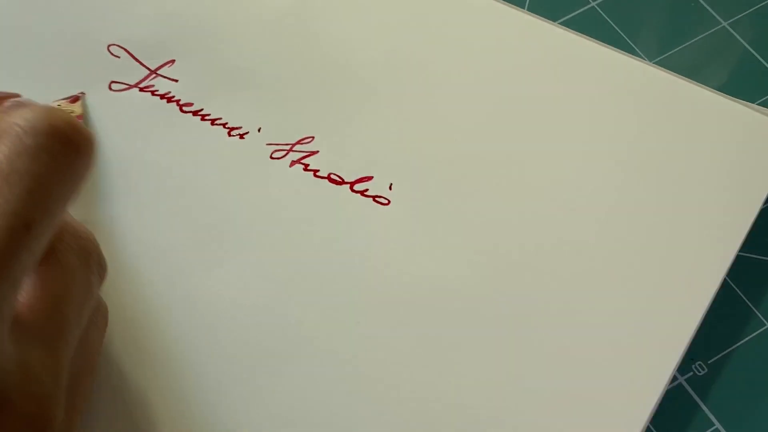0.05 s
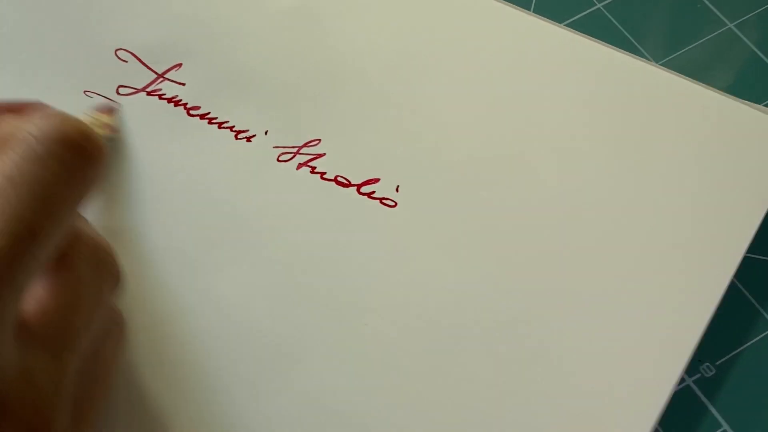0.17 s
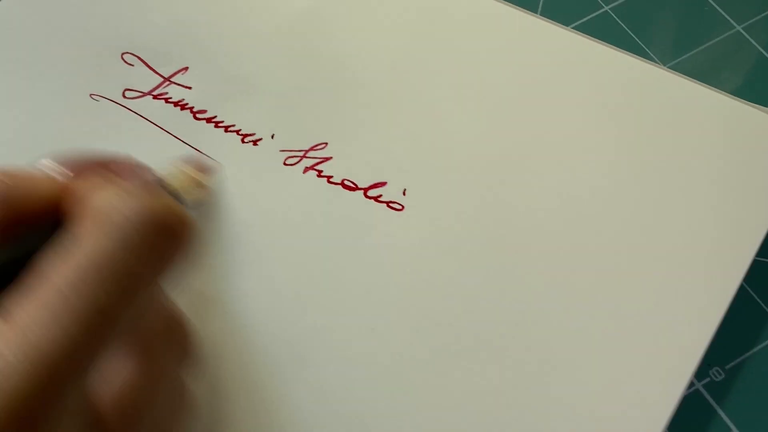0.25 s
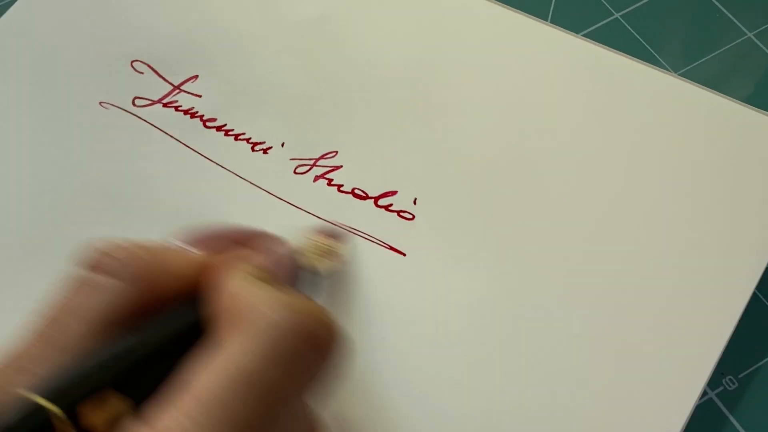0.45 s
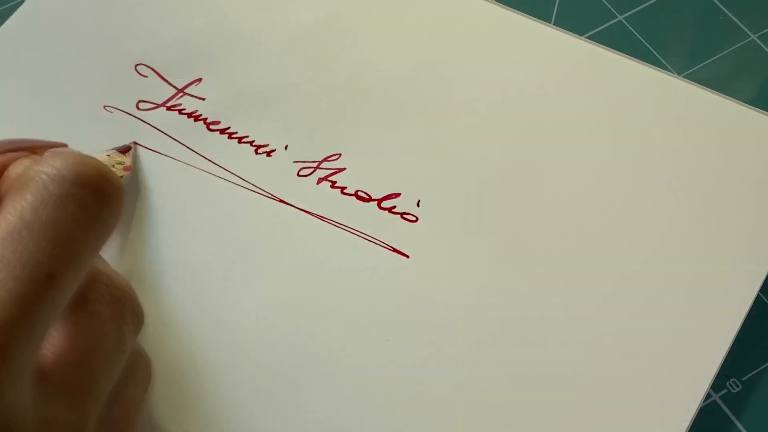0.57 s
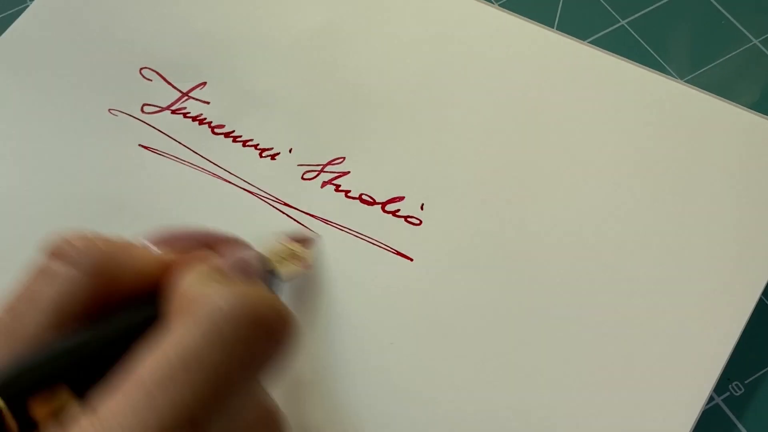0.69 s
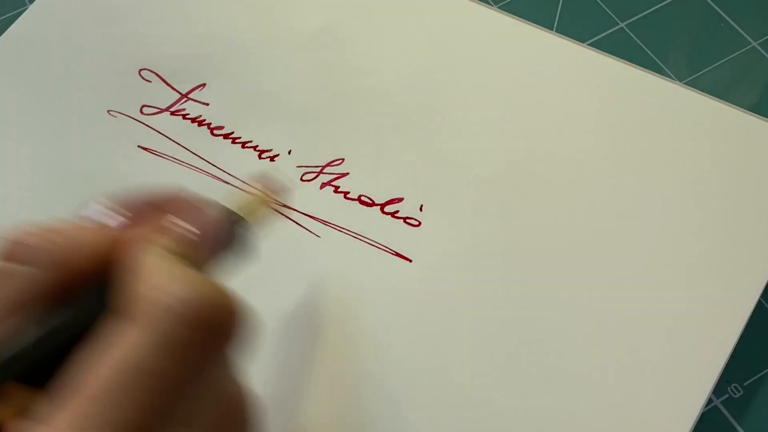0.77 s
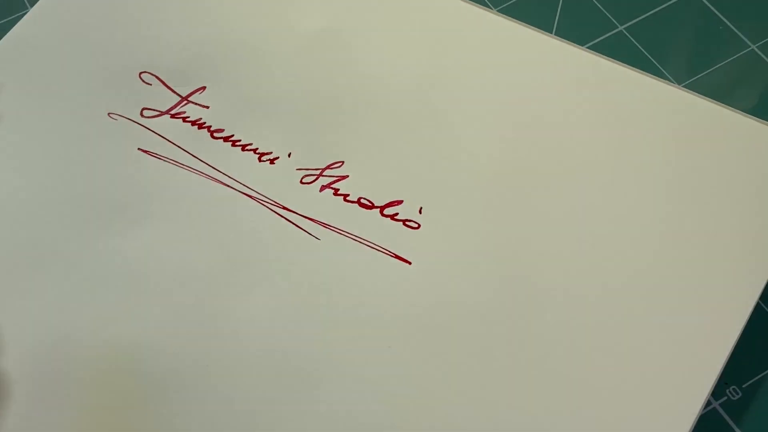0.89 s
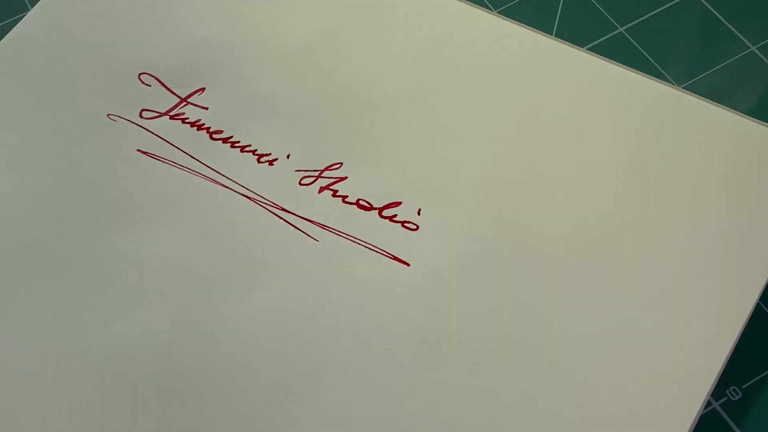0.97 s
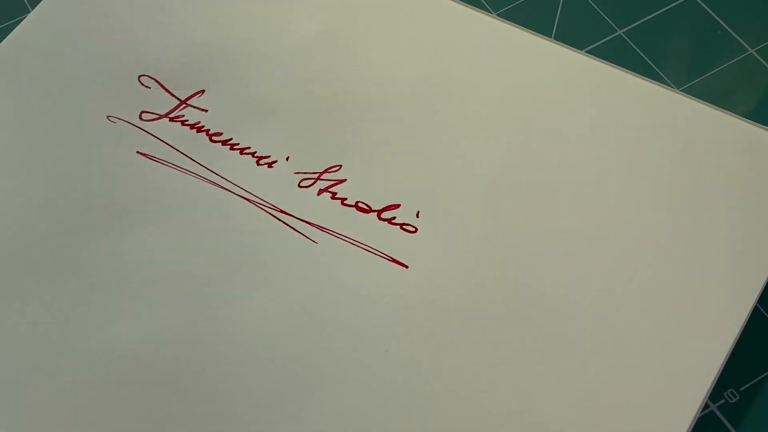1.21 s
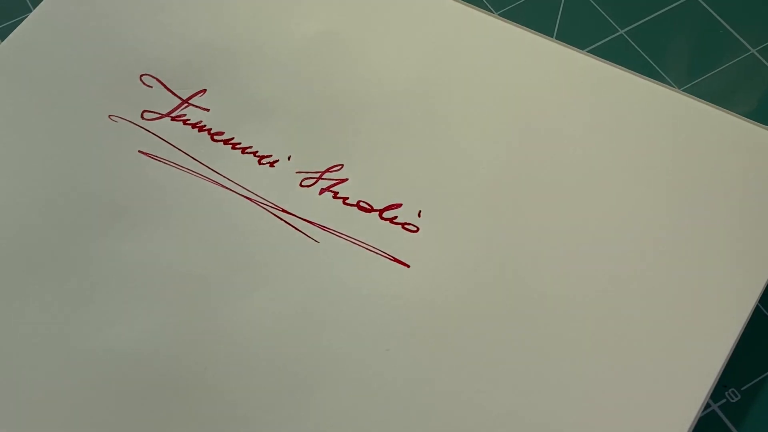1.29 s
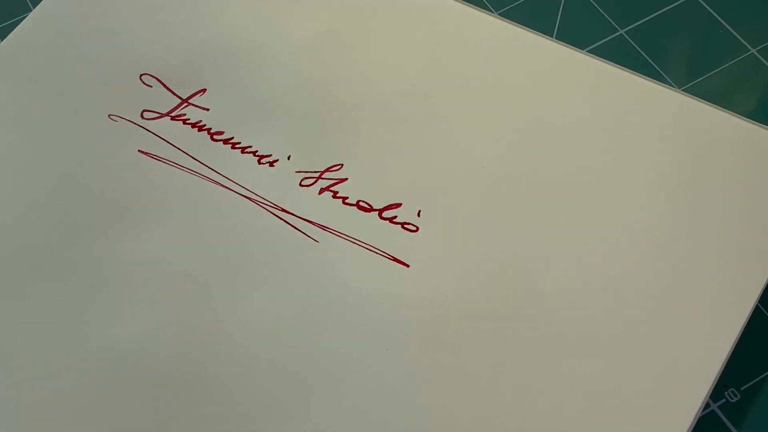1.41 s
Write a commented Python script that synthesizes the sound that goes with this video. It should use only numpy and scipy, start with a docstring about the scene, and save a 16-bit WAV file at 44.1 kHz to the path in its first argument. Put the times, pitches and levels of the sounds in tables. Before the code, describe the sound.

Close, dry mono pickup of a metal nib underlining on a sheet over a desk: faint finger scuffs, three rapid ringing scratches, then only gentle hand rubs and dull little bumps over low room hush.

```python
"""A small room's hush and faint scuffs of fingers on paper come first; then a fountain pen underlines a signature.
Three quick strokes go mainly right, back left and hard right. Paper fibres pluck the nib at random moments,
and the pen, sheet and desk turn these tiny clicks into a ringing scratch, with hiss, drumming and bright snags.
The hand bumps softly during the strokes and after them, and goes on rubbing and brushing over the paper.
Bumps and scuffs are shaped tones and noise; echoes, faint rings and room reflections surround the pen."""
import sys
import numpy as np
from scipy import signal
from scipy.fft import rfft, irfft
from scipy.io import wavfile
from scipy.ndimage import uniform_filter1d, map_coordinates

SR = 44100
rng = np.random.default_rng(int(sys.argv[2]) if len(sys.argv) > 2 else 0)


def generate_wav(sig):
    """Save sig (samples, or channels by samples) to the path in sys.argv[1] as 16-bit PCM at SR."""
    pcm = np.round(np.clip(np.atleast_2d(sig).T, -1, 1) * 32767).astype(np.int16)
    wavfile.write(sys.argv[1], SR, pcm)


N = 63945
T = np.arange(N) / SR  # time in s
HZ = np.fft.rfftfreq(2 * N, 1 / SR)  # filter frequencies; twice the length leaves room for ringing

# In the colour tables only the shape counts: the filtered sound is brought to rms 1 afterwards.
# still air of the room [f/Hz, relative level/dB]
AIR_COLOUR = [(18, -40), (28, -4), (40, -4), (58, 1), (78, -1), (112, 1.5), (160, -6), (270, -3.5),
              (450, -14), (1000, -17), (3000, -30.5), (7000, -41), (10500, -46.5), (16000, -35)]
AIR_DB = -61
# fade time of the room's reflections [f/Hz, time to fall 60 dB/s]
ROOM_FADE = [(200, 1), (1000, 0.28), (2500, 0.53), (5000, 0.21), (10000, 0.37), (16000, .2)]
ROOM_DB = -10.5  # relative to the pen
# things on the desk that ring in sympathy [f/Hz, time to fall 60 dB/s, gain at the centre/dB]
SYMPATHETIC_RINGS = [(329, 0.26, 13.5), (830, .5, -3), (1650, 0.42, -2), (2530, 0.54, -4)]
# echoes from nearby surfaces [delay at left end/s, delay at right end/s, level relative to the pen/dB]
ECHO_PATHS = [(.0021, 0.0021, -17), (.0047, .0042, -17), (.0083, 0.011, -14)]
# rising scuffs of fingers on paper [start t/s, length/s, level/dB, first f/Hz, last f/Hz, width/Hz]
FINGER_SCUFFS = [(0.066, 0.073, -64.5, 1340, 1950, 480), (0.083, 0.055, -67, 758, 1150, 450),
                 (.80, .125, -65, 4770, 6200, 1550)]
# dull rub of the sliding hand [t/s, level/dB], and its colour [f/Hz, relative level/dB]
RUB_LEVEL = [(0, -76), (.06, -75.5), (.09, -71.5), (.125, -70.5), (.15, -75.5), (.70, -57), (.78, -56),
             (.83, -55), (.89, -62), (.94, -66.5), (1.0, -61), (1.06, -61.5), (1.11, -64), (1.2, -61),
             (1.26, -60), (1.35, -59), (1.45, -59)]
RUB_COLOUR = [(100, -4), (280, 0), (600, 4), (1050, -1), (1400, 0.5), (2400, -2), (3100, -1.5), (3600, -6),
              (5000, -10), (8000, -18), (10500, -30), (15500, -22)]
RUB_RING_HZ, RUB_RING_WIDTH_HZ, RUB_RING_DB = 3010, 320, -3  # the rubbed paper's own resonance
# light brush of the sliding hand [t/s, level/dB], and its colour [f/Hz, relative level/dB]
BRUSH_LEVEL = [(0, -81), (.1, -71.5), (.15, -82), (.74, -93), (.81, -60), (.885, -61.5), (.92, -66.5),
               (.96, -77), (.99, -64.5), (1.055, -58), (1.09, -60.5), (1.12, -68.5), (1.21, -69.5),
               (1.25, -63), (1.33, -66), (1.45, -62.5)]
BRUSH_COLOUR = [(1000, -9), (3200, -4.5), (4900, 2), (6300, -4.5), (8200, -3.5), (9700, -9.5), (10600, -17),
                (13500, -10.5), (16000, -10)]
# bumps of the hand on the desk [start t/s, level before the fade/dB, pitch f/Hz, time to fall 60 dB/s]
HAND_BUMPS = [(.369, -41.5, 98, 0.08), (.575, -47.5, 118, 0.16), (0.807, -47.5, 65.5, 0.12),
              (1.033, -47.5, 108, 0.1), (1.24, -47, 125, 0.055)]
BUMP_RISE_S = 0.0062
# place of the nib along the underline [t/s, place from 0 = left end to 1 = right end]
NIB_PLACE = [(.16, 0.54), (.25, 0.41), (.36, 0.98), (.48, 0.54), (.57, 0.038), (.68, 0.046), (.73, 0.356)]
# bright snags of the nib in the paper [start t/s, level before the fade/dB]
NIB_SNAGS = [(.168, -54), (.446, -46), (.530, -40.5), (0.638, -48), (.664, -44), (.708, -40)]
SNAG_RISE_S, SNAG_T60_S = 0.0019, 0.04
# colour of the snags [f/Hz, relative level/dB]
SNAG_COLOUR = [(600, 0), (1300, -6), (2500, -14), (5000, -17), (6600, 3), (9500, -10), (13000, -12),
               (15000, -1.5)]
# force of the nib, one list per stroke [t/s, level/dB]
STROKE_FORCE = [
    [(.150, -80), (.166, -55.5), (.195, -47.5), (.24, -44.5), (.28, -39), (.33, -36), (.37, -36.5),
     (.395, -42), (.418, -53)],
    [(.438, -56), (.448, -44.5), (.492, -39), (.53, -41), (.56, -37.5), (.597, -38.5), (.614, -51)],
    [(.626, -60), (.640, -34.5), (.667, -30.5), (.70, -33.5), (.716, -39), (.73, -45.5), (.76, -69)],
]
# random slips per second, and how unequal they are: mean step up from the smallest slip
FIBRES_PER_S, FIBRE_SPREAD_DB = 14000, 3
TOOTH_HZ, TOOTH_DB = 347, 1.23  # fine unevenness of the paper
PATCH_HZ, PATCH_DB = 50, 0.05  # coarse unevenness
# broad colour of the scratch [f/Hz, relative level/dB]
SCRATCH_COLOUR = [(120, -45), (300, -21.5), (560, -10), (800, -1), (1400, -1), (1750, -2.5), (2150, 1),
                  (2600, -3.5), (3100, -2.5), (3900, -10.5), (4600, -9), (5200, -4.5), (5700, -25),
                  (7200, -32), (8300, -14.5), (9300, -39), (16000, -38)]
SCRATCH_DB = -0.75  # relative to the force
# resonances of pen, sheet and desk [f/Hz, width/Hz, level at left end/dB, level at right end/dB]
# MODE_DB is added to both levels
BODY_MODES = [(777, 75, -3.5, -1), (1024, 39, -1, -3), (1253.5, 60.4, -24, 5), (1552, 36, 5, 6.5),
              (1652, 40, 3, -23), (1959, 37.6, 17, -24), (2070, 49, -20, 12), (2391, 48, -2, 6.5),
              (2862, 17, -16, 6.5), (3050, 43, 8, -3), (4250, 33, -29, 3.5), (5050, 146, 3, -0.5),
              (7800, 230, -17, -22)]
MODE_DB = -3.5
# level of the scratch's low register relative to the rest [t/s, level/dB]
LOW_LEVEL = [(.17, 4.5), (.25, 1), (.30, 1.5), (.365, -2.5), (.41, 7.5), (.49, 1.5), (.548, -5), (.58, 1.5),
             (.65, -0.5), (.71, 2)]
LOW_SPLIT_HZ = 1640
# fine hiss of the nib, relative to the force [t/s, level/dB], and its colour [f/Hz, relative level/dB]
HISS_LEVEL = [(.17, -9), (.21, -9.5), (.26, -8.5), (.34, -14), (.40, -16), (.45, -12), (.535, -7.5),
              (.595, -16), (.645, -13.5), (.672, -6), (.70, -10.5), (.73, -20)]
HISS_COLOUR = [(1000, -17.5), (3000, 6), (6300, 2), (7300, 0.5), (8200, 1.5), (9100, -4.5), (10500, -7.5),
               (11700, -2.5), (13000, -6.5), (14100, 3), (14850, 10), (15400, 5.5), (16000, -1.5)]
# drumming of the sheet on the desk [f/Hz, relative level/dB]
DRUM_COLOUR = [(150, -16.5), (330, -13.5), (480, -1), (700, 5.5), (1100, -0.5), (2500, -38.5)]
# level when the force is at the knee, that force, and how steeply the drumming grows with force
DRUM_DB, DRUM_KNEE_DB, DRUM_POWER = -46.5, -33, 2.37
LOW_CUT_HZ, EDGE_HZ = 39, 15780


def amp(db):
    """Turns decibels into a gain."""
    return 10 ** (np.asarray(db) / 20)


def evened(x):
    """Scales a sound to rms 1."""
    return x / np.sqrt(np.mean(x ** 2) + 1e-20)


def read(points, hz):
    """Reads a table between its points, with frequency on a log axis."""
    f, value = np.transpose(points)
    return np.interp(np.log(hz + 1), np.log(f), value)


def level(points):
    """Gain over time, with straight lines in dB between the points."""
    return amp(np.interp(T, *np.transpose(points)))


def colour(points):
    """Filter with the given spectrum that only responds after its input (minimum phase)."""
    log_gain = np.log(amp(read(points, HZ)))
    circle = np.concatenate([log_gain, log_gain[-2:0:-1]])  # add the mirrored negative frequencies
    return np.exp(np.conj(signal.hilbert(circle)))[:len(HZ)]


def filtered(x, response):
    """Multiplies the spectrum by a response and returns to time."""
    return irfft(rfft(x, 2 * N) * response)[:N]


def through(x, response):
    """Filters a sound and brings the result to rms 1."""
    return evened(filtered(x, response))


def wander(hz):
    """Smooth random movement, mostly slower than the given rate."""
    return through(rng.standard_normal(N), np.exp(-(HZ / hz) ** 2))


def catches(per_s, spread_db):
    """Tiny slips at random moments: single-sample clicks of uneven size and random sign."""
    size = amp(spread_db * np.minimum(rng.exponential(1, N), 3))
    sign = rng.choice([-1., 1.], N)
    happens = rng.random(N) < per_s / SR
    return size * sign * happens


def blow(start, db, rise_s, t60):
    """Envelope of a knock: a quick straight rise times an exponential fall."""
    t = np.maximum(T - start, 0)
    return np.minimum(t / rise_s, 1) * amp(db - 60 * t / t60)


def place():
    """Where the nib is along the line, 0 to 1."""
    return np.clip(np.interp(T, *np.transpose(NIB_PLACE)), 0, 1)


def air():
    """Still air of the room: steady noise with a low colour."""
    return amp(AIR_DB) * through(rng.standard_normal(N), colour(AIR_COLOUR))


def room(x):
    """Diffuse reflections: a noise tail in which each frequency has its own fade time."""
    hz, t, z = signal.stft(rng.standard_normal(SR // 2), SR, nperseg=256)
    fade = amp(-60 * t / read(ROOM_FADE, hz)[:, None])
    late = t > .004
    tail = signal.istft(z * fade * late, SR, nperseg=256)[1]
    return signal.fftconvolve(x, tail / np.linalg.norm(tail))[:N]


def sympathy(x):
    """Things on the desk answer the pen: narrow resonances that ring on."""
    response = 0
    for hz, t60, db in SYMPATHETIC_RINGS:
        time_constant = t60 / np.log(1000)
        response = response + amp(db) / (1 + 2j * np.pi * (HZ - hz) * time_constant)
    return filtered(x, response)


def echoes(x):
    """Early reflections: delayed copies whose paths change as the nib travels."""
    out = np.zeros(N)
    smooth_place = uniform_filter1d(place(), size=2000)
    for left_s, right_s, db in ECHO_PATHS:
        delay = left_s + (right_s - left_s) * smooth_place
        out += amp(db) * map_coordinates(x, [(T - delay) * SR], order=3)
    return out


def scuffs():
    """Fingers on paper: narrow, fuzzy rubs whose pitch rises as the finger speeds up."""
    out = np.zeros(N)
    for start, length, db, first_hz, last_hz, width in FINGER_SCUFFS:
        along = np.clip((T - start) / length, 0, 1)
        pitch = first_hz + (last_hz - first_hz) * along
        phase = 2 * np.pi * np.cumsum(pitch) / SR
        # slow noise on both parts of a tone widens it into a band
        fuzz = wander(width / 2) * np.cos(phase) + wander(width / 2) * np.sin(phase)
        out += amp(db) * np.sin(np.pi * along) * fuzz
    return out


def hand():
    """Skin slides on paper: many tiny slips with a fine grain make a dull rub and a light brush."""
    grain = amp(0.7 * wander(180))
    ring = 1 + amp(RUB_RING_DB) / (1 + 2j * (HZ - RUB_RING_HZ) / RUB_RING_WIDTH_HZ)
    rub_slips = grain * catches(per_s=14000, spread_db=4.5)
    rub = level(RUB_LEVEL) * through(rub_slips, colour(RUB_COLOUR) * ring)
    brush_slips = grain * catches(per_s=22000, spread_db=5.5)
    brush = level(BRUSH_LEVEL) * through(brush_slips, colour(BRUSH_COLOUR))
    return rub + brush


def bumps():
    """The side of the hand nudges the desk: a few damped low cycles each time."""
    out = np.zeros(N)
    for start, db, hz, t60 in HAND_BUMPS:
        out += blow(start, db, BUMP_RISE_S, t60) * np.sin(2 * np.pi * hz * (T - start))
    return out


def snags():
    """Clumps of fibres give way at once: short bursts of bright slips."""
    bite = sum(blow(start, db, SNAG_RISE_S, SNAG_T60_S) for start, db in NIB_SNAGS)
    return bite * through(catches(FIBRES_PER_S, FIBRE_SPREAD_DB), colour(SNAG_COLOUR))


def body(end):
    """Pen, sheet and desk as a filter: broad colour plus resonances (end 0 = left, 1 = right)."""
    broad = colour(SCRATCH_COLOUR)
    rings = 0
    for hz, width, *db in BODY_MODES:
        rings = rings + amp(db[end] + MODE_DB) / (1 + 2j * (HZ - hz) / width)
    return broad + rings * broad / abs(broad)  # the rings share the broad colour's phase


def nib():
    """Fibres pluck the nib: a ringing scratch, a fine hiss, and low drumming that grows with force."""
    force = np.zeros(N)
    for stroke in STROKE_FORCE:
        touching = (T > stroke[0][0]) * (T < stroke[-1][0])
        force += level(stroke) * touching
    tooth = amp(TOOTH_DB * wander(TOOTH_HZ) + PATCH_DB * wander(PATCH_HZ))
    slips = tooth * catches(FIBRES_PER_S, FIBRE_SPREAD_DB)

    # blend the sound of the two ends as the nib travels
    at_left, at_right = through(slips, body(0)), through(slips, body(1))
    scratch = amp(SCRATCH_DB) * ((1 - place()) * at_left + place() * at_right)
    low = filtered(scratch, 1 / (1 + (HZ / LOW_SPLIT_HZ) ** 10))
    scratch = scratch + (level(LOW_LEVEL) - 1) * low

    hiss_slips = tooth * catches(FIBRES_PER_S, FIBRE_SPREAD_DB)
    hiss = level(HISS_LEVEL) * through(hiss_slips, colour(HISS_COLOUR))
    drum_level = amp(DRUM_DB) * (force / amp(DRUM_KNEE_DB)) ** DRUM_POWER
    drum = drum_level * through(slips, colour(DRUM_COLOUR))
    return force * (scratch + hiss) + drum


def scene():
    """Pen and hand close by, over the room's low hush."""
    pen = nib() + snags()
    space = echoes(pen) + sympathy(pen) + amp(ROOM_DB) * room(pen)
    return (pen + space + bumps() + hand() + scuffs() + air())[None]


def record(dry):
    """The recorder cuts the deep bass and the highest treble."""
    bass_cut = signal.butter(4, LOW_CUT_HZ, "high", fs=SR, output="sos")
    cut = signal.sosfilt(bass_cut, dry)
    band_limit = signal.firwin(801, EDGE_HZ, window=("kaiser", 9), fs=SR)
    return signal.oaconvolve(cut, band_limit[None], "same")


dry = scene()
out = record(dry)
generate_wav(out)
```